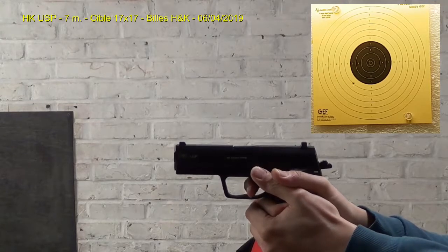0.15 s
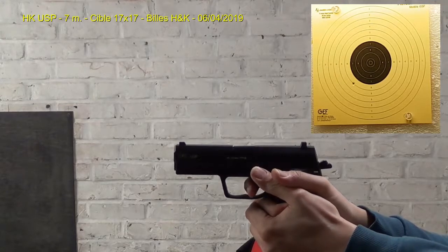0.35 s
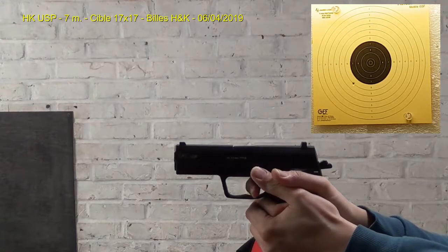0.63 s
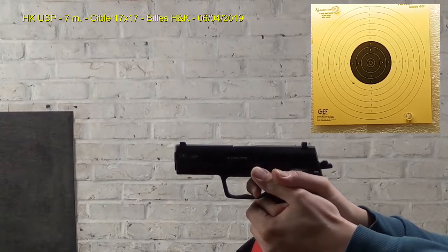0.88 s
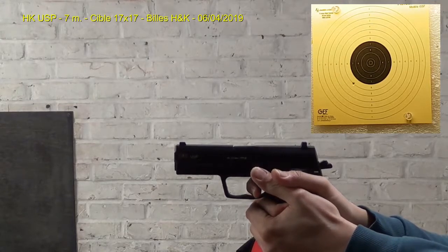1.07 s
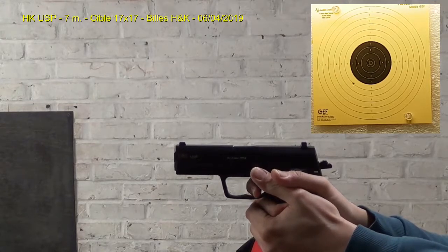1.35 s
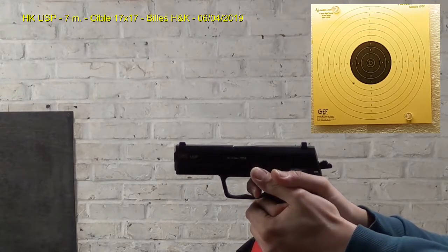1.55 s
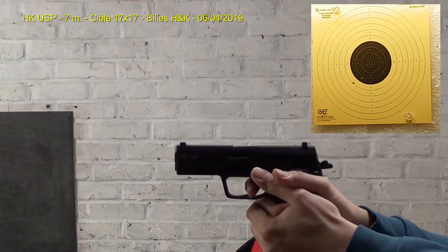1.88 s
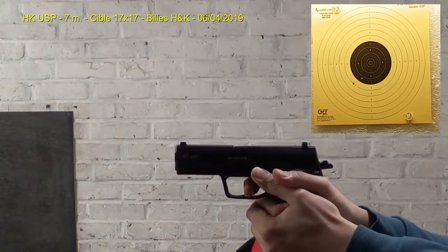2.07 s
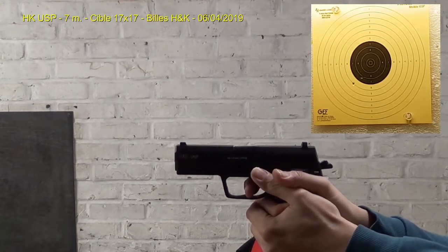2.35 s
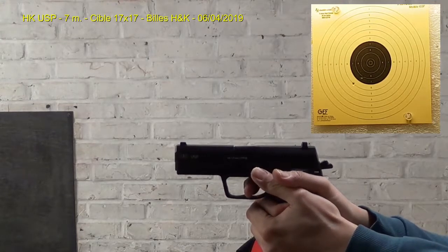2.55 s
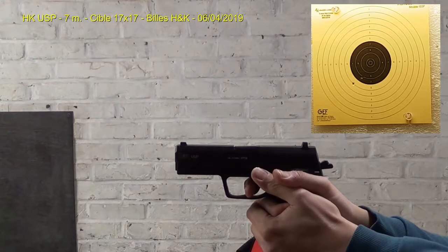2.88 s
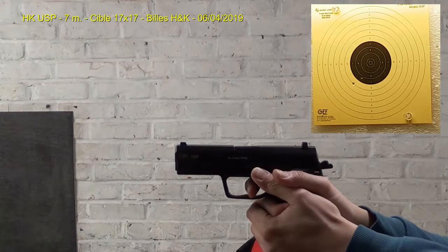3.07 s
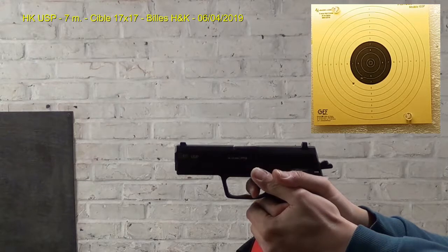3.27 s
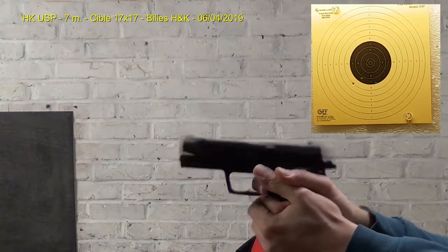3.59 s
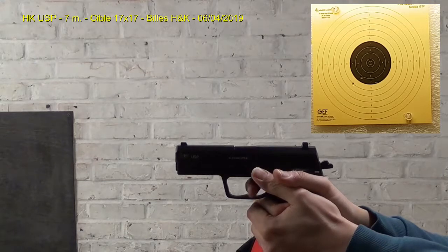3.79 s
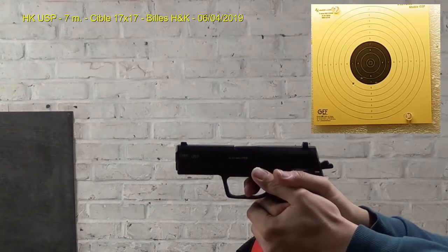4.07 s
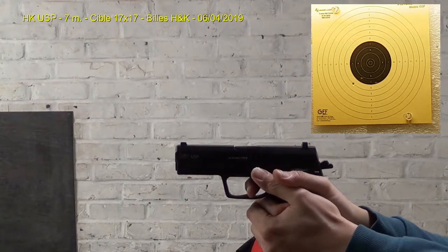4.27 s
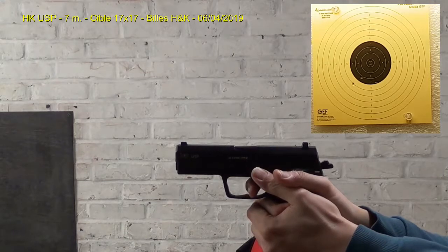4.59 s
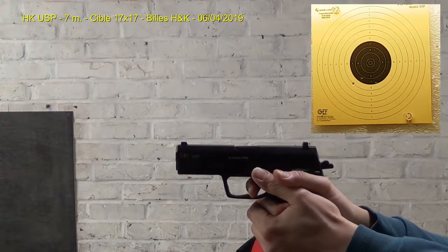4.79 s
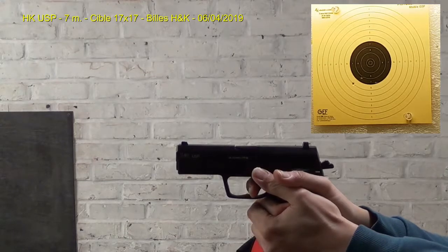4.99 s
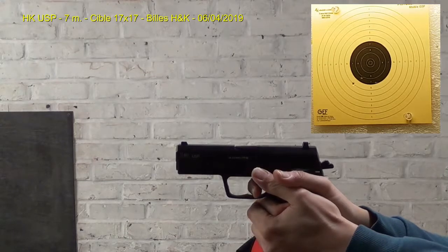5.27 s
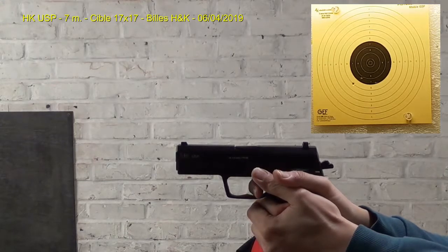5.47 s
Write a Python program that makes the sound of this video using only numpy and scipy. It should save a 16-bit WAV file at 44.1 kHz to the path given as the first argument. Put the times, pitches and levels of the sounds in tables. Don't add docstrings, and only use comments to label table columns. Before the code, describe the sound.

A gas-powered pistol fires three sharp single shots about two seconds apart, pellets clanging on steel, over faint birdsong and a distant engine rumble.

```python
import sys
import numpy as np
from scipy import signal
from scipy.io import wavfile
from scipy.ndimage import uniform_filter1d

SR = 44100
rng = np.random.default_rng(int(sys.argv[2]) if len(sys.argv) > 2 else 0)


def put_to_file(sound):
    columns = np.atleast_2d(sound).T
    safe = np.clip(columns, -1, 1)
    whole_steps = np.round(safe * 32767)
    wavfile.write(sys.argv[1], SR, whole_steps.astype(np.int16))


def level_to_linear(level):
    exponent = np.asarray(level, float) / 20
    return 10 ** exponent


N = 248724

# (time [s], strength [dB])
SHOTS = [
    (1.6483, 0),
    (3.6029, 0),
    (5.5544, 0),
]
# (frequency [Hz], density [dB/Hz])
BOUNCE = [(120, -54.5), (300, -22), (702, -22.5), (926, -8.5), (1270, -11.5), (2130, -2), (2650, -8),
          (6680, -7), (12700, -11), (15300, -21.5), (16500, -48.5)]
# (frequency [Hz], likeness [0-1])
YARD_SAME = [(60, 0.68), (180, 1), (550, 0.84), (1650, 0.47), (4970, 0.6), (15000, 0.92)]
# (frequency [Hz], likeness [0-1])
AIR_SAME = [(60, 1), (180, 0.91), (550, 0.067), (1650, 0.014), (4970, 0.77), (15000, 0.79)]


def evened(x):
    return x / np.sqrt(np.mean(x ** 2) + 1e-20)


def read(points, hz):
    f, value = np.transpose(points)
    return np.interp(np.log(hz + 1), np.log(f + 1), value)


def add(mix, s, sound):
    part = mix[:, round(s * SR):][:, :sound.shape[1]]
    part += sound[:, :part.shape[1]]


def sine(hz, t):
    return np.sin(2 * np.pi * hz * t)


def panned(pan_db):
    return level_to_linear([[pan_db / 2], [-pan_db / 2]])


def noise(colour, same, count, size, t60=None, patchy_db=0):
    # (frequency [Hz], left over right [dB])
    yard_lean = [(60, 0), (180, -6), (550, 3), (1650, 4), (4970, 0), (15000, 0)]
    frames = count * 4 // size + 5
    hz = np.fft.rfftfreq(size, 1 / SR)
    a, b, c, d, patches = rng.standard_normal((frames, len(hz), 5)).T
    like = np.clip(read(same, hz), -1, 1)[:, None]
    left = a + 1j * b
    right = like * left + np.sqrt(1 - like ** 2) * (c + 1j * d)
    z = np.array([left, right]) * evened(level_to_linear(read(colour, hz)))[:, None] / np.sqrt(size * 4 / 3)
    patches = uniform_filter1d(uniform_filter1d(patches, size=7, axis=0), size=6, axis=1)
    z = z * level_to_linear(patchy_db * evened(patches))
    if t60:
        lean = level_to_linear(np.array([.5, -.5])[:, None, None] * read(yard_lean, hz)[:, None])
        frame_s = np.arange(frames) * size / 4 / SR
        z = z * lean * level_to_linear(-60 * frame_s / read(t60, hz)[:, None])
    return signal.istft(z, nperseg=size, noverlap=size * 3 // 4)[1][:, :count]


def hit(colour, direct_db, rise_s, t60_s, yard_db, pan_db, modes=()):
    # (frequency [Hz], t60 [s])
    yard_t60 = [(100, 0.12), (250, 0.17), (500, 0.25), (1500, 0.25), (5000, 0.24), (10000, 0.19),
                (14000, 0.16), (16000, 0.066)]
    crackle_db = 2.0
    t = np.arange(SR // 2) / SR
    rise_s = np.clip(rise_s, 1e-4, .01)
    swell = np.clip(t / rise_s, 0, 1)
    burst = noise(colour, [(100, 1), (200, 1)], count=len(t), size=256)[0] * swell ** 2
    burst *= level_to_linear(direct_db - 60 * np.maximum(t - rise_s, 0) / t60_s)
    for hz, db, ring_s in modes:
        phase = hz * rng.normal(1, 0.0066) * t + rng.random()
        burst += swell * level_to_linear(db - 60 * t / ring_s) * np.sin(2 * np.pi * phase)
    walls = noise(colour, YARD_SAME, count=len(t), size=256, t60=yard_t60, patchy_db=1.5)
    crackle = signal.oaconvolve(rng.standard_normal(len(t)), np.hanning(100), "same")
    walls = walls * evened(level_to_linear(crackle_db * evened(crackle)))
    build_up = 1 - np.exp(-t / (rise_s + 0.00065))
    return burst * panned(pan_db) + level_to_linear(yard_db) * walls * build_up


def open_air():
    # (frequency [Hz], density [dB/Hz])
    air_colour = [(53, -35), (90, -0.5), (208, -4.5), (293, -1.5), (341, -6), (396, -4), (441, -3),
                  (1500, -8.5), (2570, -9.5), (4040, -7), (6070, -15.5), (14000, -20.5), (15300, -14.5)]
    return level_to_linear(-48) * noise(air_colour, AIR_SAME, count=N, size=2048, patchy_db=1.98)


def engines():
    # (frequency [Hz], density [dB/Hz])
    rumble_colour = [(15, -43), (32, -8.5), (42, -4), (52, 1), (65, -11.5), (90, -17.5), (140, -35)]
    # (time [s], level [dB])
    rumble_db = [
        (0.0, -67.5),
        (1.51, -66),
        (2.28, -65.5),
        (2.5, -71),
        (2.7, -70),
        (3.66, -68.5),
        (4.7, -68),
        (4.84, -63),
        (4.96, -65.5),
        (5.64, -74),
    ]
    swell = level_to_linear(np.interp(np.arange(N) / SR, *np.reshape(rumble_db, (-1, 2)).T) + 12.5)
    return swell * noise(rumble_colour, AIR_SAME, count=N, size=8192)


def electronic_whine():
    whine_hz, whine_db = 15625, -61
    field_hz, gap_at_s, gap_share, gap_depth = 50, .007, 0.133, .9
    t = np.arange(N) / SR
    field = ((t - gap_at_s) * field_hz + .5) % 1 - .5
    gaps = 1 - gap_depth * np.exp(-(field / gap_share) ** 2)
    return np.sqrt(2) * level_to_linear(whine_db) * sine(whine_hz, t) * gaps


def call(length_s, first_hz, glide, warble_hz):
    u = np.arange(round(length_s * SR)) / (length_s * SR)
    warbles_per_s, start = 52 * rng.uniform(.8, 1.6), rng.random()
    shake = np.sin(2 * np.pi * (warbles_per_s * length_s * u + start)) * rng.uniform(.8, 1)
    rasp = evened(uniform_filter1d(rng.standard_normal((2, len(u))), size=120, axis=1))
    hz = first_hz * (1 + (glide - 1) * u) + warble_hz * (shake + 0.5 * rasp[0])
    tone = np.sqrt(2) * np.sin(2 * np.pi * np.cumsum(hz) / SR)
    roughness_db = 3.5 * rasp[1] - 1.0
    return tone * signal.windows.tukey(len(u), .6) * level_to_linear(min(warble_hz / 60, 1) * roughness_db)


def birds():
    # (time [s], length [s], first pitch [Hz], level [dB])
    falls = [(0.163, 0.055, 3820, -58), (0.248, 0.0417, 5310, -50), (0.627, 0.069, 3560, -58.5),
             (.79, .05, 3700, -61), (1.421, 0.057, 5000, -65), (0.783, 0.057, 4140, -57),
             (0.942, 0.062, 4330, -54), (1.074, 0.12, 4750, -55.5), (1.415, 0.065, 3540, -60),
             (2.158, 0.053, 4050, -57.5), (2.309, 0.063, 4070, -50), (2.538, 0.062, 4190, -55.5),
             (2.661, 0.062, 5380, -57), (2.684, 0.056, 4470, -57), (2.747, 0.067, 3560, -63),
             (3.04, 0.071, 5780, -56.5), (3.113, 0.094, 4340, -53), (3.433, 0.088, 4290, -56),
             (4.022, 0.1, 4220, -56.5), (4.116, 0.11, 4710, -54), (4.38, 0.16, 4200, -56),
             (4.6, 0.091, 4360, -52.5), (4.929, 0.085, 4440, -52.5), (5.206, 0.085, 4180, -55.5),
             (5.319, 0.085, 4395, -59)]
    # (time [s], length [s], first pitch [Hz], level [dB])
    sags = [(0.018, 0.035, 3832, -57), (0.072, 0.048, 3250, -62.5), (0.277, 0.075, 4040, -52.5),
            (0.578, 0.089, 5400, -62.5), (0.603, 0.059, 4240, -54.5), (1.058, 0.075, 5466, -63),
            (1.236, 0.077, 5840, -62.5), (1.288, 0.11, 3540, -55.5), (1.349, 0.055, 5660, -60),
            (1.978, 0.039, 4750, -56), (2.235, 0.084, 4690, -54.5), (2.64, 0.074, 5900, -58.5),
            (2.673, 0.048, 4637, -57), (2.742, 0.055, 4000, -55), (2.866, 0.057, 4950, -55.5),
            (2.93, 0.059, 4150, -54), (3.029, .03, 4150, -52), (3.169, 0.11, 3220, -61.5),
            (3.28, .072, 5740, -68), (3.389, 0.063, 5180, -60.5), (4.579, 0.042, 4780, -52),
            (4.807, 0.068, 4730, -53.5)]
    # (time [s], length [s], first pitch [Hz], level [dB])
    climbs = [(0.222, 0.051, 5070, -53.5), (0.299, 0.089, 4630, -57), (0.508, 0.067, 3520, -57),
              (0.882, 0.086, 4450, -61.5), (1.255, 0.094, 4310, -55), (1.368, 0.12, 4060, -59),
              (3.003, 0.028, 3720, -53), (3.48, 0.038, 4530, -67), (3.536, 0.023, 3120, -54.5),
              (4.199, 0.07, 3900, -53), (4.864, .086, 4080, -53), (5.181, 0.051, 4210, -53)]
    # (time [s], pitch [Hz], level [dB])
    whistle_rows = [(0, 6000, -65.5), (.066, 5400, -61), (0.138, 3970, -52), (.45, 4140, -57.5),
                    (.53, 5826, -57), (.65, 4900, -70), (0.759, 4800, -65.5), (.815, 5550, -63),
                    (0.818, 2820, -61.5), (.97, 3640, -65), (.997, 3000, -57.5), (.985, 3640, -66),
                    (.67, 5240, -72), (1.3, 4800, -65), (1.44, 3420, -60), (1.097, 4120, -60),
                    (1.155, 3630, -59), (1.34, 3350, -60), (2.177, 3610, -59), (2.29, 4540, -57),
                    (2.34, 3785, -58), (2.56, 3600, -64), (2.789, 2780, -64), (3.14, 3780, -60.5),
                    (2.931, 4180, -56), (3.462, 3140, -57), (4.435, 3250, -60), (4.5, 3700, -65),
                    (4.651, 3270, -54), (4.723, 3070, -60), (4.888, 3480, -55), (5.241, 3370, -59)]
    # (time [s], length [s], first pitch [Hz], level [dB])
    coos = [
        (.74, .1, 378, -67),
        (.9, .07, 398, -63),
        (1.03, .15, 403, -65),
        (1.25, .07, 405, -65),
        (1.47, .14, 395, -66),
    ]
    # (last over first pitch [ratio], warble [Hz])
    fall_motion = (.73, 485)
    sag_motion = (.93, 204)
    climb_motion = (1.17, 473)
    level_motion = (0.97, 64)
    coo_motion = (1, 6.9)
    whistle_s = 0.046
    whistles = [(s, whistle_s, hz, db) for s, hz, db in whistle_rows]
    kinds = ((fall_motion, falls), (sag_motion, sags), (climb_motion, climbs),
             (level_motion, whistles), (coo_motion, coos))
    out = np.zeros((1, N))
    for motion, rows in kinds:
        for s, length_s, hz, db in rows:
            add(out, s, level_to_linear(db) * call(length_s, hz, *motion)[None])
    count, tail_t60_s = SR // 3, 0.27
    tail = noise([(100, 0), (200, 0)], YARD_SAME, count=count, size=256)
    tail = tail * level_to_linear(-60 * np.arange(count) / SR / tail_t60_s)
    echoes = signal.fftconvolve(out, tail / np.linalg.norm(tail[0]), axes=1)[:, :N]
    return level_to_linear(-3) * out + level_to_linear(0.94) * echoes


def trap_ring():
    # (time [s], level [dB])
    ring_rows = [
        (0, -58.5),
        (1.75, -51),
        (3.698, -44),
    ]
    ring_hz, ring_t60_s = 1818.6, 2.12
    out = np.zeros((2, N))
    t = np.arange(2 * SR)[None] / SR
    for s, db in ring_rows:
        add(out, s, level_to_linear(db - 60 * t / ring_t60_s) * sine(ring_hz, t))
    return out


def pistol():
    # (frequency [Hz], density [dB/Hz])
    hammer_colour = [(180, -54), (450, -35), (870, -11.5), (1400, 10), (2400, 0.5), (4520, -8),
                     (4910, -2.5), (6520, -8), (11000, -8.5), (13000, -29), (16000, -36)]
    blast_colour = [(35, -61), (80, -21.5), (283, -7), (586, -6.5), (796, -7.5), (1690, -5.5), (1990, -8.5),
                    (2970, -10), (4220, -8), (7780, 0.2), (11600, -6), (15000, -15.5), (16500, -50)]
    slide_colour = [(59, -51.5), (100, -59), (1220, -0.5), (1380, -32), (1710, 1), (3780, -7.5),
                    (4880, -1.5), (9880, 1.5), (14200, -5.5), (15500, -16), (16500, -56)]
    trap_colour = [(59, -65), (130, -34), (250, 0.5), (486, 6.5), (1330, 0.5), (2170, 9), (4390, -1.5),
                   (6730, -30), (10300, -46), (13600, -40), (14500, -31.5), (16500, -121)]
    # (direct [dB], rise [s], t60 [s], yard [dB], left-right [dB])
    hammer_fall = (-8.5, 0.45, 0.15, -28.5, 5)
    # (time after blast [s], direct [dB], rise [s], t60 [s], yard [dB], left-right [dB])
    gas = [
        (0, 36.6, 0.000088, 0.00065, 28.7, 2),
        (.0018, 32, 0.00082, 0.0032, 22.1, 1.3),
    ]
    slide_stop = (.0455, 23, 0.00023, 0.036, 18.9, 1.27)
    trap_hit = (.094, 4.2, 0.0014, 0.13, 4.1, 9.1)
    # (frequency [Hz], level [dB], t60 [s])
    hammer_modes = [(896, -23, 0.04), (2258, -20.5, 0.029), (3305, -26.5, 0.036)]
    muzzle_modes = [(7000, 33, .005), (9100, 32, .005)]
    slide_modes = [(1715, 4, 0.12), (2310, 7.5, 0.084), (5070, 12, 0.085), (6080, -7, 0.14),
                   (6550, 5, 0.11), (7230, -12.5, 0.11)]
    trap_modes = [(524, -5, 0.12), (626, -18.5, 0.28), (763, -11.5, 0.14), (870, -8.5, 0.15),
                  (1954, -16, 0.074), (2190, -4, 0.18)]
    # (level [dB], frequency [Hz], t60 [s])
    gas_push = (15, 277.5, 0.066)
    landing_db = [1.3, 0, 0.1]
    hammer_lead_s = .0106
    out = np.zeros((2, N))
    push_db, push_hz, push_t60_s = gas_push
    t = np.arange(SR // 5)[None] / SR
    for (s, db), trap_db in zip(SHOTS, landing_db):
        add(out, s - hammer_lead_s, hit(hammer_colour, *hammer_fall))
        for hz, ring_db, t60_s in hammer_modes:
            ring = np.minimum(t / 0.0035, 1) ** 2 * level_to_linear(ring_db - 60 * t / t60_s) * sine(hz, t)
            add(out, s - hammer_lead_s, ring)
        for after_s, *part in gas:
            add(out, s + after_s, level_to_linear(db) * hit(blast_colour, *part, modes=muzzle_modes))
        add(out, s, np.minimum(t / 0.008, 1) * level_to_linear(push_db - 60 * t / push_t60_s) * sine(push_hz, t))
        add(out, s + slide_stop[0], level_to_linear(db) * hit(slide_colour, *slide_stop[1:], modes=slide_modes))
        add(out, s + trap_hit[0], level_to_linear(trap_db) * hit(trap_colour, *trap_hit[1:], modes=trap_modes))
    return out


def fading_shot_db(s):
    since_s = min(s - shot for shot, _ in SHOTS if shot < s)
    return 25 - 218.5 * since_s


def cracks():
    # (time [s], level over the fading shot [dB])
    crack_rows = [(1.6505, 1), (1.747, 7), (1.765, 5), (1.8672, 18.5), (3.605, 11), (3.61, 12), (3.616, 4),
                  (3.6246, 10), (3.6497, 3), (3.7022, 2), (3.749, 6), (3.8385, 21), (5.607, 4), (5.626, 5)]
    # (rise [s], t60 [s], left-right [dB])
    crack_shape = (0.00025, 0.0078, 2.6)
    out = np.zeros((2, N))
    t = np.arange(1024) / SR
    rise_s, t60_s, pan_db = crack_shape
    for s, db in crack_rows:
        snap = noise(BOUNCE, [(100, 1), (200, 0.86)], count=len(t), size=256) * np.minimum(t / rise_s, 1)
        add(out, s, snap * level_to_linear(fading_shot_db(s) + db - 60 * t / t60_s) * panned(pan_db))
    return out


def rattles():
    # (time [s], frequency [Hz], level over the fading shot [dB])
    rattle_rows = [(1.651, 390, -5.5), (1.658, 400, -13), (1.674, 1710, -2.5), (1.686, 590, -5),
                   (1.703, 1767, 1), (1.711, 1820, 4), (1.721, 1730, -1), (1.742, 626, 7),
                   (1.752, 2020, -7), (1.752, 258, -4), (1.764, 734, 5), (1.768, 2200, -5),
                   (1.778, 2200, 1), (1.793, 810, -6), (1.803, 2130, -15), (1.8665, 2200, 6),
                   (1.8665, 1660, 0), (1.87, 990, 2), (1.915, 2100, 6), (3.8375, 1720, 15.5),
                   (3.8375, 2200, 16), (3.838, 3140, 7), (3.841, 984, 10.5), (3.852, 1010, 8),
                   (3.876, 990, 11), (3.88, 1800, 13), (3.915, 1790, 14), (3.604, 1115, -3),
                   (3.606, 6550, -2), (3.607, 270, -9.5), (3.621, 6130, 0), (3.649, 4980, 4.5),
                   (3.612, 477, -6), (3.614, 7900, 3), (3.628, 1670, -8), (3.633, 8000, -8),
                   (3.639, 1730, -14), (3.642, 555, -4.5), (3.653, 1690, -3), (3.674, 1220, -2),
                   (3.676, 1805, 1), (3.689, 1100, -8), (3.697, 470, -2.5), (3.700, 1900, -6),
                   (3.712, 2110, -8), (3.723, 2190, 1), (3.731, 2190, -1), (3.746, 2240, 5.5),
                   (3.747, 2590, 0), (3.603, 593, -3), (3.852, 3080, 8), (3.87, 3040, 12),
                   (3.984, 1000, 11), (3.755, 2200, -5), (3.764, 2190, -4), (5.560, 1160, -2),
                   (5.578, 1656, 0), (5.604, 2310, 4), (5.610, 2160, -1), (5.622, 1670, 1),
                   (5.626, 1200, -3)]
    rise_s, t60_s, pan_db = 0.0022, 0.03, 3
    out = np.zeros((2, N))
    t = np.arange(SR // 10)[None] / SR
    for s, hz, db in rattle_rows:
        shape = np.minimum(t / rise_s, 1) * level_to_linear(fading_shot_db(s) + db - 60 * t / t60_s)
        add(out, s, shape * sine(hz, t) * panned(pan_db))
    return out


def under_blow(modes, blow_db):
    return [(hz, blow_db + under_db, ring_s) for hz, under_db, ring_s in modes]


def pellet_bounces():
    # (time [s], direct [dB], rise [s], t60 [s])
    bounce_rows = [
        (1.866, -7.5, 0.0011, 0.035),
        (3.8372, -3.5, 0.0026, 0.0093),
    ]
    # (frequency [Hz], level under the blow [dB], t60 [s])
    bounce_modes = [(927, -27, 0.21), (1020, -30.5, 0.21), (1734, -22.5, 0.23), (1974, -26, 0.19),
                    (2200, -21, 0.18), (3080, -32, 0.25), (4030, -21.5, .1), (4900, -40, 0.24)]
    yard_under_db, pan_db = -6.5, 7
    out = np.zeros((2, N))
    for s, db, rise_s, t60_s in bounce_rows:
        modes = under_blow(bounce_modes, db)
        add(out, s, hit(BOUNCE, db, rise_s, t60_s, db + yard_under_db, pan_db, modes))
    return out


def knocks(colour, shape, rows, modes=()):
    out = np.zeros((2, N))
    rise_s, t60_s, pan_db = shape
    for s, db, yard_db in rows:
        add(out, s, hit(colour, db, rise_s, t60_s, yard_db, pan_db, under_blow(modes, db)))
    return out


def thuds():
    # (frequency [Hz], density [dB/Hz])
    thud_colour = [(120, -46), (250, -8), (450, 4.5), (800, 5), (1150, 6.5), (1700, -4), (2300, -12),
                   (3000, -25), (5000, -41)]
    # (time [s], direct [dB], yard [dB])
    thud_rows = [
        (2.22, -56, -47.5),
        (2.304, -36.5, -31.5),
        (2.319, -39, -36),
        (2.342, -53, -45),
        (3.955, -37, -34.5),
        (4.018, -37.5, -38),
        (4.051, -49, -40.5),
        (4.089, -47, -45),
    ]
    dull_rows = [
        (4.365, -42.5, -51),
        (4.419, -58, -61),
        (4.5, -53, -64),
    ]
    # (rise [s], t60 [s], left-right [dB])
    thud_shape = (0.0057, 0.091, 5.8)
    dull_shape = (0.012, 0.65, 0.092)
    # (frequency [Hz], level under the blow [dB], t60 [s])
    thud_modes = [(513.4, -4.5, 0.11), (743, -21, 0.21), (930, -12, 0.09), (1240, -18, 0.089),
                  (2180, -11, .05)]
    dull_colour = [(hz * 0.26, db) for hz, db in thud_colour]
    return knocks(thud_colour, thud_shape, thud_rows, thud_modes) + knocks(dull_colour, dull_shape, dull_rows)


def trigger_ticks():
    # (frequency [Hz], density [dB/Hz])
    tick_colour = [(800, -24), (2500, -9), (4500, -2), (6800, -16), (9800, 0), (11300, -10), (12500, -22),
                   (16000, -36)]
    # (rise [s], t60 [s], left-right [dB])
    tick_shape = (.0004, .007, 0)
    # (time [s], direct [dB], yard [dB])
    tick_rows = [
        (3.068, -42, -62),
        (3.4355, -35, -57),
        (5.3828, -30, -54),
    ]
    return knocks(tick_colour, tick_shape, tick_rows)


def scene():
    background = open_air() + engines() + electronic_whine() + birds() + trap_ring()
    shots = pistol() + cracks() + rattles()
    return background + shots + pellet_bounces() + thuds() + trigger_ticks()


def held(db, fall_db_per_s):
    fall = np.arange(N) * fall_db_per_s / SR
    return np.maximum.accumulate(db + fall) - fall


def starved(x, share_db):
    quiet_db = -36
    hz, _, z = signal.stft(x, SR, nperseg=1024)
    power = (abs(z) ** 2).sum(0)
    whole = power.sum(0)
    band = np.repeat(power[:512].reshape(32, 16, -1).sum(1), 16, axis=0)
    hz = hz[:512, None]
    keep = (band > whole * level_to_linear(2 * share_db)) | (hz < 12500) | (whole < level_to_linear(2 * quiet_db))
    z[:, :512] *= keep * ((hz < 15760) | (band > level_to_linear(-100)))
    return signal.istft(z, SR, nperseg=1024)[1][:, :N]


def top_cut(x):
    return signal.sosfilt(signal.butter(12, 16810, fs=SR, output="sos"), x)


def record(dry):
    mid, side = (dry[0] + dry[1]) / 2, (dry[0] - dry[1]) / 2
    side = signal.sosfiltfilt(signal.butter(2, 9000, fs=SR, output="sos"), side)
    wet = np.array([mid + side, mid - side])
    power_db = 10 * np.log10(abs(uniform_filter1d((wet ** 2).mean(0), size=200)) + 1e-12)
    over_db = np.maximum(held(power_db + 10.5, fall_db_per_s=756), 0)
    look = 95
    ahead_db = np.maximum(over_db, np.r_[over_db[look:], np.zeros(look)] * .4)
    slow_db = np.clip(power_db + 20.5, 0, 8.5)
    slow_db[0] = 5.5
    slow_db = np.maximum(held(slow_db, fall_db_per_s=5.0), 0)
    ducked = wet / level_to_linear(uniform_filter1d(ahead_db, size=40) + slow_db)
    mix = starved(np.clip(ducked * level_to_linear(4.2), -.99, .99), share_db=-33)
    return top_cut(mix)


dry = scene()
out = record(dry)
put_to_file(out)
```